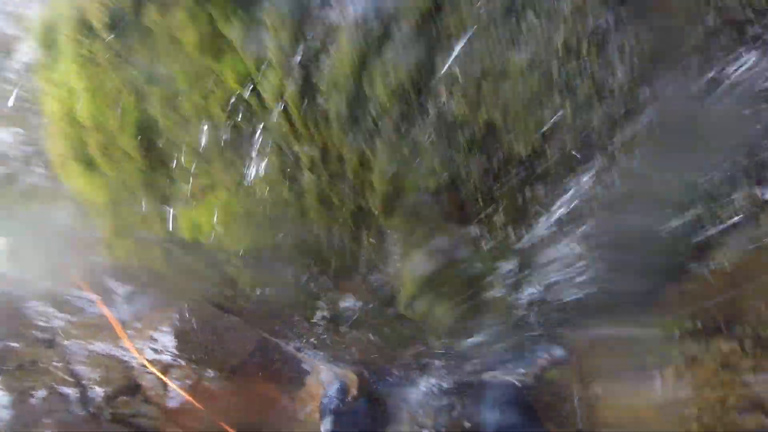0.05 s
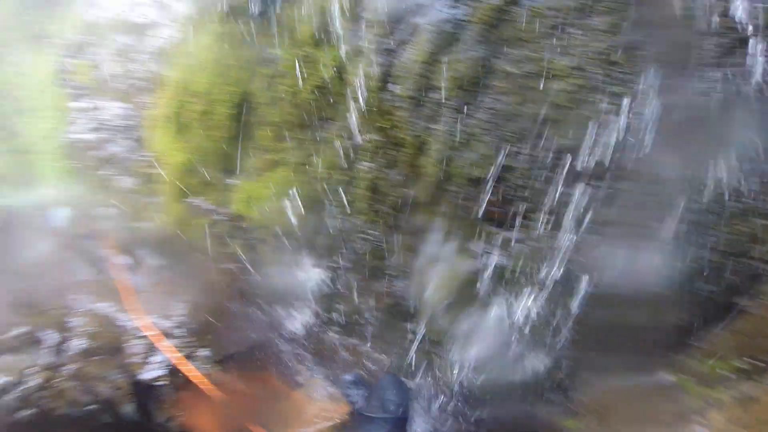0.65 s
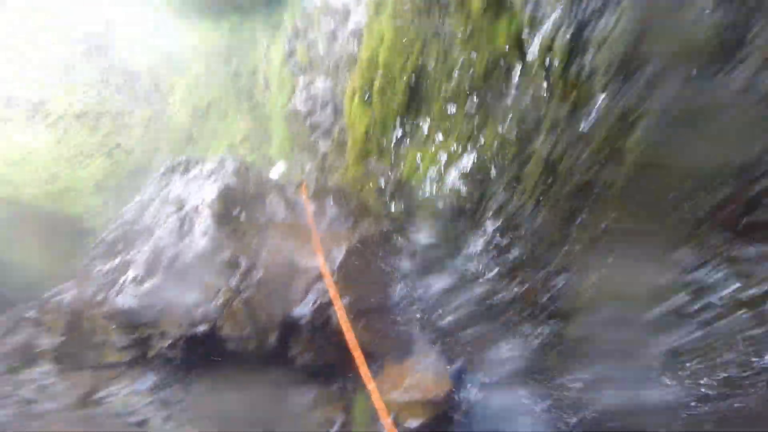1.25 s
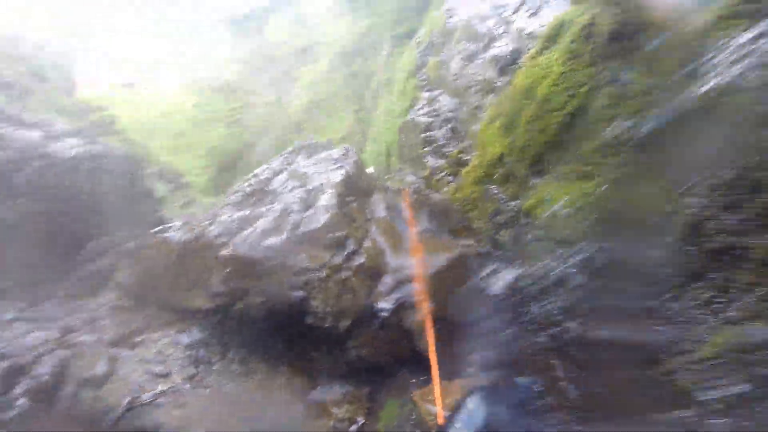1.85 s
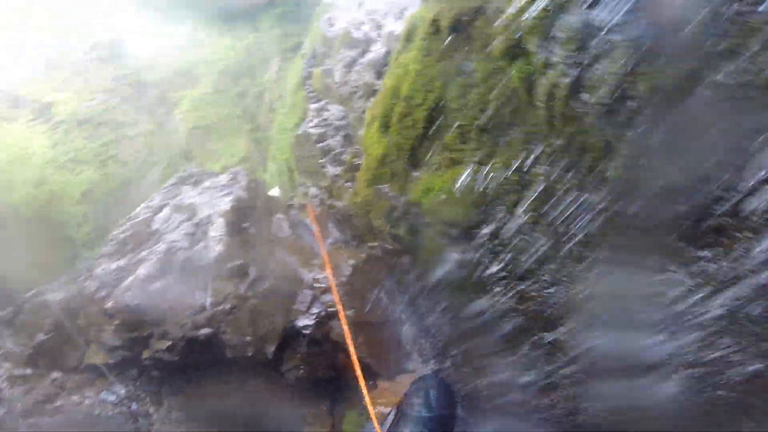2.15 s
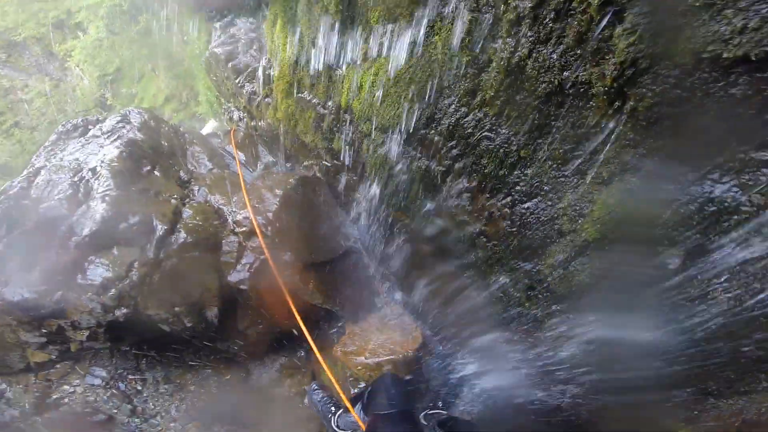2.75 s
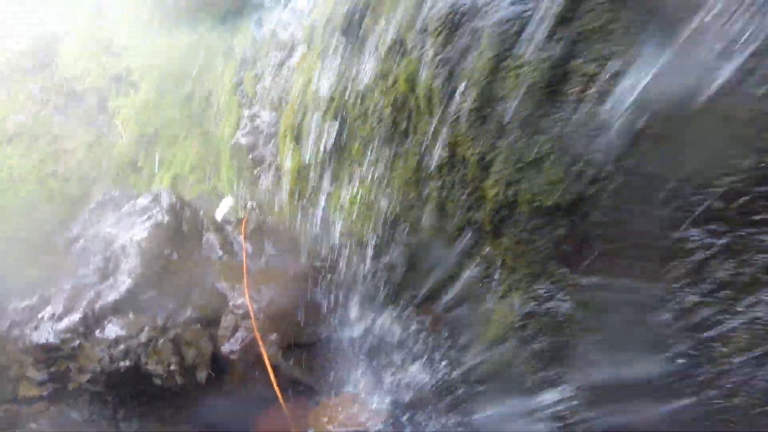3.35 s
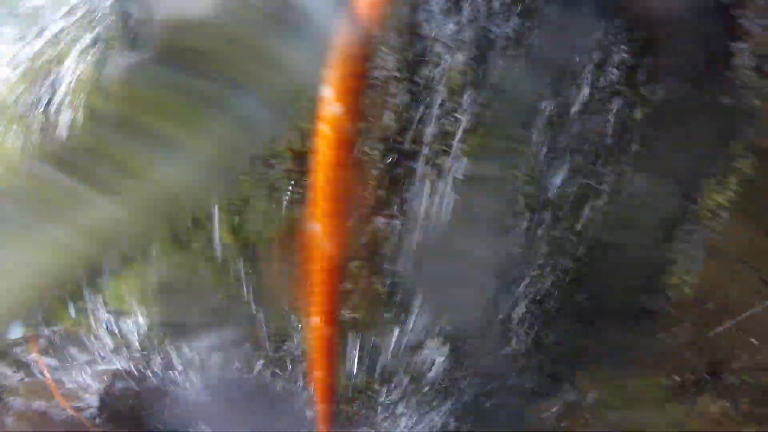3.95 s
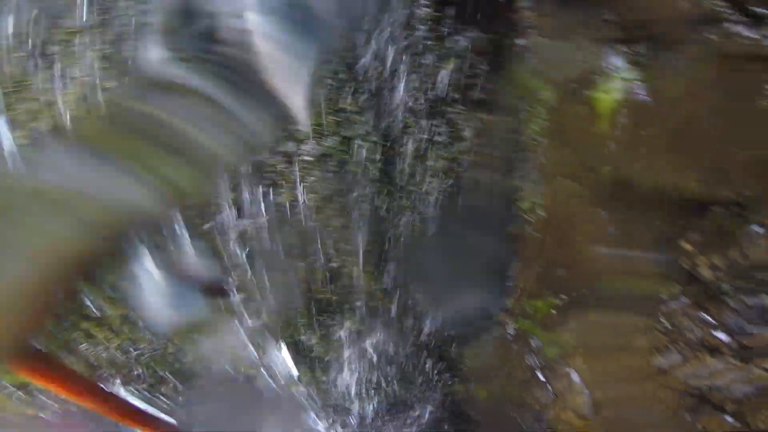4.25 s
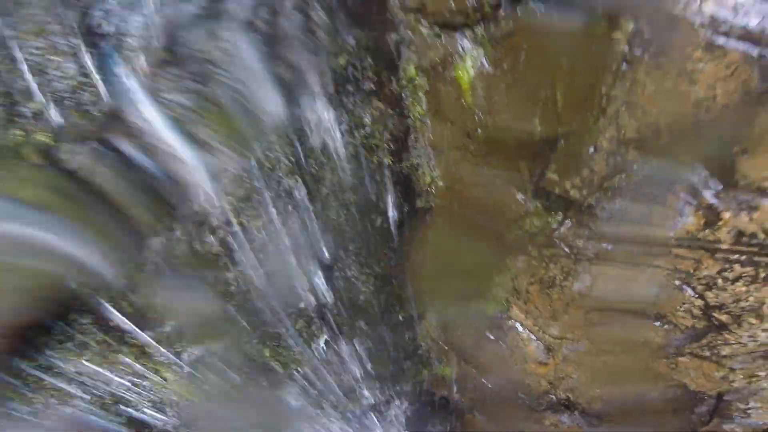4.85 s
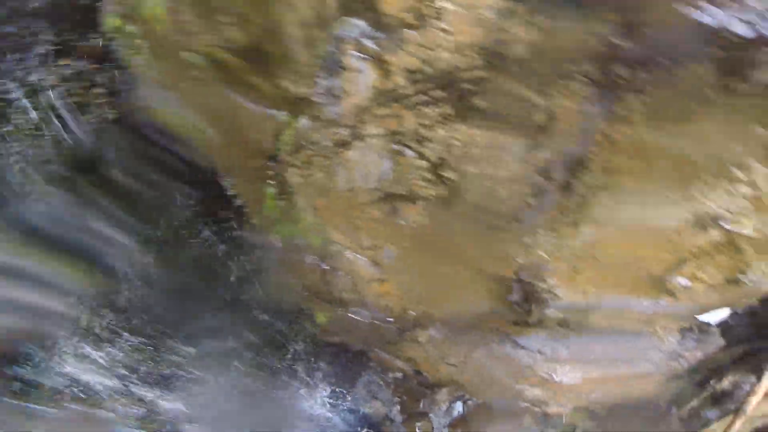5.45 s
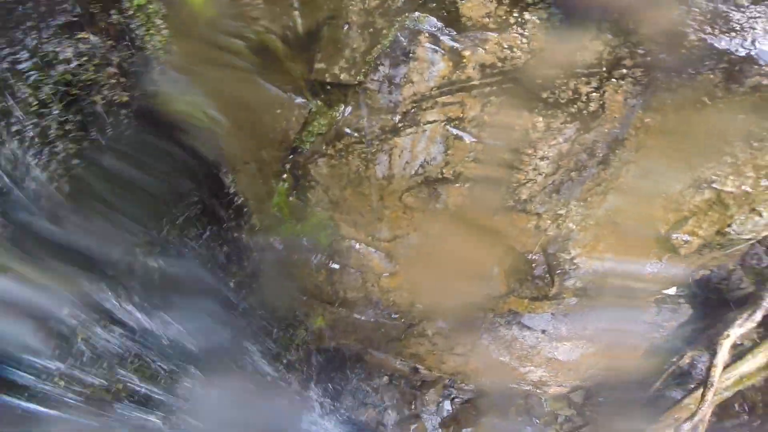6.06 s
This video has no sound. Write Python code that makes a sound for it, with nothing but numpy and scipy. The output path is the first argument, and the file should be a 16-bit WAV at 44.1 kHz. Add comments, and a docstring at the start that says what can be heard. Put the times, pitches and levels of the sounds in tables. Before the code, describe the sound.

Heard from inside a moving camera's waterproof case, a close waterfall sprays over mossy rock with a continuous, slightly ringing hiss. Light taps of water give way to a run of loud, sharp knocks and thumps as drops strike the case in the middle. Brief trickles gurgle over it and something wet rubs it once. The spray carries on with a few last knocks and a soft rumble from the mount.

```python
"""Waterfall spray on a camera case

A small waterfall sprays over mossy rock, right beside a moving camera in a waterproof case.
The water hisses and patters through the resonances of the case; streams gurgle over it, drops knock
and spatter on it, and something wet rubs along it once. Handling rumbles in the mount, and a limiter
pulls the water down after the hardest drops."""
import sys
import numpy as np
from scipy import signal
from scipy.io import wavfile
from scipy.ndimage import uniform_filter1d, minimum_filter1d

SR = 44100
rng = np.random.default_rng(int(sys.argv[2]) if len(sys.argv) > 2 else 0)


def store_pcm(level_fs):
    """Save levels as 16-bit WAV."""
    pcm = np.round(np.clip(level_fs, -1, 1) * 32767).astype(np.int16)
    wavfile.write(sys.argv[1], SR, np.atleast_2d(pcm).T)


N = 273420
TIME = np.arange(N) / SR

# the falling water as the camera moves in and out of it: time_s, gush_db, spray_db
WATER_LEVELS = [(0.0, -43.5, -45), (0.75, -43, -42), (1.2, -44, -43.5), (1.45, -42, -42.5),
                (1.85, -44.5, -45), (2.3, -43.5, -43.5), (2.95, -43.5, -40.5), (3.6, -39.5, -38),
                (4.25, -35.5, -34), (4.65, -39.5, -38), (5.33, -37, -33), (5.55, -42, -40),
                (6.2, -42.5, -40.5)]
# hard drops on the case: start_s, peak_db, pitch_hz, second_pitch_hz, push_db, splash_db, thump_db
# (push and splash are relative to the ring of the case; the mount's thump has its own level)
HARD_DROPS = [(0.4577, -18.5, 1610, 3720, -17, -15, -48), (0.5207, -19.5, 2360, 1430, -28, -16, -38),
              (0.5488, -17.5, 4870, 1900, -34, 2, -45), (0.7783, -18.5, 690, 1400, -5, -9, -26.5),
              (1.2818, -19, 1480, 990, -21, -20, -34), (1.3925, -11, 1740, 1770, 7, -9, -37),
              (1.5025, -11.5, 2180, 5000, -5, 1, -32), (1.5412, -25.5, 1190, 2620, -3, -8, -45),
              (1.559, -16.5, 1640, 2700, -12, -5.5, -43), (2.8701, -5.5, 1540, 2480, 2, -11, -46),
              (2.8936, -12, 2190, 1490, -18, -18, -42), (3.0728, -23.5, 2590, 1470, -32, -6, -26),
              (3.1189, 2, 2330, 2830, -25, -3, -48), (3.153, 13.5, 2490, 2360, -18, -11, -8),
              (3.1612, 16, 1600, 2510, -18, -10.5, -21), (3.2039, 7.5, 590, 2520, 3.5, -2, -6),
              (3.2248, -12, 1670, 1760, -34, -25, -50), (3.271, 5, 2800, 2320, -18, -6.5, -40),
              (3.3292, 7.5, 1450, 2920, -22, -13.5, -9), (3.351, 5.5, 2540, 2030, -20, -4.5, -42),
              (3.4989, -1, 3540, 1940, -11, 1.5, -15.5), (3.6513, -13.5, 2230, 2620, -32, -16, -40),
              (3.7672, -1, 2270, 5950, -25, -5, -32), (3.8016, 9, 2020, 5270, -11, -2, 0.5),
              (3.9575, 16.5, 1616, 2180, -20, -18.5, -9.5), (4.262, -12, 2880, 1070, -13, -8, -20.5),
              (4.467, 13, 2370, 2156, -26.5, -13.5, -41), (4.4783, 10.5, 2150, 2510, -14, -6, -13.5),
              (4.6474, -2.5, 1540, 2050, -1.5, -17, -40), (4.7584, -12, 1490, 2900, -13, -6, -13),
              (4.7858, -10, 1610, 3420, -15, -25, -30), (4.8268, -2, 1550, 2330, -22, -8.5, -41),
              (4.8457, -6, 2140, 1490, -27, -7, -16), (4.8576, 4.5, 1470, 2470, -2.5, -8, -13),
              (4.8879, -4.5, 1760, 2430, -28, -12.5, -48), (4.9128, -2, 1240, 3230, -22, -31, -41),
              (5.3232, -8, 4640, 5800, -32, 10, -29.5), (5.9255, -18, 1420, 2160, -25, -14, -27),
              (6.0918, -5, 2440, 1130, -9.5, -6, -7), (6.124, -16, 3150, 2300, -16, -3, -27),
              (6.1929, -11.5, 2380, 4540, -47, -9, -50)]
# what the stiff wall passes to the air inside: frequency_hz, gain_db
WALL_RESPONSE = [(100, -45), (400, -13), (700, -2.5), (1000, 1.5), (1450, -5), (2650, -3.5), (3100, -3),
                 (4000, -1), (8000, -33.5), (16000, -36)]
# the bright splash of a bursting drop: frequency_hz, gain_db
SPLASH_SPECTRUM = [(500, -26), (2500, 2), (3800, 1), (4800, 1.5), (6200, 0.5), (7800, -8), (10000, -12.5),
                   (12500, -19), (16000, -25.5)]


def gain_of(db):
    """Decibels to amplitude."""
    return 10 ** (np.asarray(db) / 20)


def unit_rms(x):
    """Scales to rms 1."""
    return x / np.sqrt(np.mean(x ** 2) + 1e-20)


def automation(rows):
    """One curve across the scene for each value column of a timed table."""
    times, *columns = np.transpose(rows)
    return [np.interp(TIME, times, column) for column in columns]


def add(mix, start_s, sound):
    """Mixes a sound in at start_s."""
    part = mix[max(round(start_s * SR), 0):][:len(sound)]
    part += sound[:len(part)]


def colour(x, spectrum, size=4096):
    """Minimum-phase EQ with the given spectrum: clicks ring after they land."""
    hz, db = np.transpose(spectrum)
    bin_hz = abs(np.fft.fftfreq(size, 1 / SR))
    log_gain = np.log(gain_of(np.interp(np.log(bin_hz + 1), np.log(hz), db)))
    response = np.fft.ifft(np.exp(np.conj(signal.hilbert(log_gain)))).real
    return signal.oaconvolve(x, response[:size // 2])[:len(x)]


def wander(slow_hz, fast_hz, count=30):
    """Smooth random drift of rms 1."""
    t = TIME[::64]
    waves = sum(np.sin(2 * np.pi * (hz * t + rng.random())) for hz in np.geomspace(slow_hz, fast_hz, count))
    return np.interp(TIME, t, unit_rms(waves))


def ring(t, hz, t60, rise_s=0.00025):
    """One struck mode, building up over the short time that the blow lasts."""
    return (1 - np.exp(-t / rise_s)) * gain_of(-60 * t / max(t60, .001)) * np.sin(2 * np.pi * hz * t)


def patter(per_s, spread_db):
    """Random impacts, many small and a few large."""
    size = gain_of(spread_db * np.minimum(rng.exponential(1, N), 5))
    return unit_rms(size * rng.choice([-1, 1], N) * (rng.random(N) < per_s / SR))


def churn(x, patchy_db, tilt_db):
    """Splashes come and go in patches of time and pitch; the treble tilts by tilt_db per octave."""
    hz, t, bins = signal.stft(x, SR, nperseg=512, noverlap=384)
    patches = uniform_filter1d(rng.standard_normal(bins.shape), size=6, axis=0)
    patches = unit_rms(uniform_filter1d(patches, size=12, axis=1))
    treble_db = np.log2(np.maximum(hz, 5000) / 5000)[:, None] * np.interp(t, TIME, tilt_db)
    _, churned = signal.istft(bins * gain_of(patchy_db * patches + treble_db), SR, nperseg=512, noverlap=384)
    return unit_rms(churned[:N])


def pings(low_hz, high_hz, per_s, spread_db, cycles, count=32):
    """Separate droplets and bursting bubbles: short pings of many pitches."""
    t = np.arange(800) / SR
    clicks, which = patter(per_s, spread_db), rng.integers(0, count, N)
    tones = [unit_rms(ring(t, hz, cycles / hz)) for hz in np.geomspace(low_hz, high_hz, count)]
    return unit_rms(sum(signal.oaconvolve(clicks * (which == k), tone)[:N] for k, tone in enumerate(tones)))


def waterfall(gush_surge_db=1.47, spray_surge_db=1.76):
    """A blur of far impacts with nearer ones standing out: gush on the rock, fine spray above it."""
    # the body of the gush: frequency_hz, gain_db
    gush_spectrum = [(100, -5.5), (250, -12.5), (450, -14.5), (800, -15.5), (1200, -11.5), (1500, -5.5),
                     (2000, -5), (2450, 1), (2800, -5.5), (3200, -15), (4500, -35)]
    # the hiss of the spray: frequency_hz, gain_db
    spray_spectrum = [(1500, -32.5), (2900, -7), (3300, -10), (3700, 1), (4150, -3), (4700, 4),
                      (5200, -2.5), (5800, 0.5), (6700, -6.5), (8000, -13.5), (9200, -13), (10200, -10.5),
                      (11200, -18.5), (12500, -16.5), (15300, -37)]
    # the case turns towards the fine spray: time_s, treble_db_per_octave
    facing = [(0, -2), (1.4, 1.8), (6.2, 2)]
    gush_db, spray_db = automation(WATER_LEVELS)
    tilt_db, = automation(facing)
    surge = wander(4, 60)  # the fall is uneven: both layers swell and sink together
    gush = colour(rng.standard_normal(N) + gain_of(-4) * patter(per_s=900, spread_db=5.5), gush_spectrum)
    spray = rng.standard_normal(N) + gain_of(-6.5) * patter(per_s=4200, spread_db=5.5)
    spray = colour(spray, spray_spectrum)
    gush = churn(gush, patchy_db=1.1, tilt_db=tilt_db)
    gush += gain_of(-9) * pings(1643, 3190, per_s=220, spread_db=2, cycles=38)
    spray = churn(spray, patchy_db=1.62, tilt_db=tilt_db)
    spray += gain_of(-8.5) * pings(3440, 6880, per_s=400, spread_db=5, cycles=42)
    gush *= gain_of(gush_db + gush_surge_db * surge)
    spray *= gain_of(spray_db + spray_surge_db * surge)
    return gush + spray


def handling():
    """The mount rumbles unevenly as the camera is carried; short low pulses stand out of the rumble."""
    # the ride of the handling rumble: time_s, level_db
    rumble_levels = [(0.0, -34.5), (0.75, -33.5), (1.7, -38.5), (2.0, -43), (3.0, -37.5), (3.3, -23),
                     (3.55, -40), (4.3, -33), (5.0, -34.5), (5.55, -43), (6.2, -31.5)]
    # the low end of the mount: frequency_hz, gain_db
    mount_spectrum = [(12, -5), (25, 4.5), (35, 2), (47, 1.5), (60, -0.5), (78, -19.5), (100, -7),
                      (125, -7), (160, -15.5), (220, -27), (400, -39.5), (800, -52.5)]
    # low bumps of the mount, then the low body of the wet rub and a brief soft hum (the last two rows):
    # centre_s, peak_db, pitch_hz, half_length_s
    low_pulses = [(0.275, -24.5, 130, 0.024), (0.593, -18.5, 110, 0.008), (0.789, -28.5, 57.4, 0.048),
                  (0.934, -18, 46, 0.01), (1.55, -22.5, 125, 0.0075), (1.666, -16.5, 42.6, 0.019),
                  (1.68, -31, 128, 0.026), (2.215, -19.5, 76.4, 0.004), (2.277, -23, 42.5, 0.041),
                  (2.342, -28.5, 128, 0.0097), (4.478, -12.5, 52.5, 0.0074), (4.785, -21.5, 121, 0.027),
                  (5.455, -39, 156, 0.12)]
    level_db, = automation(rumble_levels)
    out = unit_rms(colour(rng.standard_normal(N), mount_spectrum, size=16384))
    out *= gain_of(level_db + 2.9 * wander(1.83, 4.6))
    for centre_s, peak_db, hz, half_s in low_pulses:
        t = np.arange(-3 * half_s, 3 * half_s, 1 / SR)
        pulse = np.exp(-(t / half_s) ** 2) * np.cos(2 * np.pi * hz * t)
        add(out, centre_s + t[0], -gain_of(peak_db) * pulse)
    return out


def trickles(spread=0.056):
    """A dense run of small bubbles of nearly one size gurgles at one pitch, swelling and fading."""
    # streams running over the case: start_s, length_s, level_db, pitch_hz
    streams = [(0.03, 0.35, -44.5, 2200), (2.70, 0.15, -40, 2240), (5.269, 0.24, -40, 2390)]
    out = np.zeros(N)
    for start_s, length_s, level_db, hz in streams:
        swell = signal.windows.tukey(round(length_s * SR), .6)
        bubbles = pings(hz * (1 - spread), hz * (1 + spread), per_s=1200, spread_db=5.5, cycles=35, count=5)
        add(out, start_s, gain_of(level_db) * swell * unit_rms(bubbles[:len(swell)]))
    return out


def tick(spot, length):
    """A small drop ticks on the case with a pinch of splash; spot and length (0-1) set pitch and decay."""
    t = np.arange(1500) / SR
    ping = ring(t, 1400 + 1400 * spot, 0.005 + 0.013 * length) + 0.36 * ring(t, 3300, 0.0069)
    fizz = 0.34 * rng.standard_normal(len(t)) * np.exp(-t / 0.00049)
    return colour(ping, WALL_RESPONSE) + colour(fizz, SPLASH_SPECTRUM)


def stray_droplets(count=70, trim_db=-47, range_db=4):
    """Stray drops land at random, harder in thick spray."""
    out = np.zeros(N)
    for when, spot, size, length in rng.random((count, 4)):
        add(out, when * N / SR, gain_of(trim_db + range_db * size ** 2) * tick(spot, length))
    _, spray_db = automation(WATER_LEVELS)
    return out * gain_of(0.88 * (spray_db - spray_db.mean()))


def hard_drops(second_mode_db=-4.5, damping=0.19, mount_hz=116, mount_t60_s=0.1):
    """Each drop shoves the wall of the case, rings it, bursts into a splash and sets the mount swinging."""
    # the dull shove of a drop on the wall: frequency_hz, gain_db
    push_spectrum = [(15, -40), (60, 6.5), (150, 3), (300, 1), (480, -3.5), (700, -4), (950, -5.5),
                     (1400, -7), (3000, -17), (8000, -53)]
    # modes of the case: pitch_hz, level_db, t60_s
    case_modes = [(750, -9, 0.0044), (1420, -21, 0.032), (1683, 2, 0.007), (1988, -24, 0.059),
                  (2105, -5.5, 0.011), (2614, 5, 0.0063), (3030, -6.5, 0.0038)]
    out, t = np.zeros(N), np.arange(4000) / SR
    blow = 1. * (t == 0)
    push = unit_rms(colour(blow, push_spectrum))
    wall = sum((-1) ** k * gain_of(db) * ring(t, hz, t60) for k, (hz, db, t60) in enumerate(case_modes))
    burst = (1 - np.exp(-t / 0.00008)) * (np.exp(-t / 0.0011) + gain_of(-14) * np.exp(-t / 0.0022))
    for start_s, peak_db, hz, second_hz, push_db, splash_db, thump_db in HARD_DROPS:
        t60 = 0.0082 * gain_of(-damping * push_db)  # a heavy push shortens the ring of the struck spot
        spot = ring(t, hz, t60) - gain_of(second_mode_db) * ring(t, second_hz, t60)
        # a first blow, then spatter, more of it for a wetter drop
        force = blow + 0.16 * gain_of(0.35 * splash_db) * rng.standard_normal(len(t)) * np.exp(-t / 0.0025)
        ringing = signal.fftconvolve(force, spot + gain_of(-7) * wall)[:len(t)]
        body = unit_rms(colour(ringing, WALL_RESPONSE))
        splash = unit_rms(colour(rng.standard_normal(len(t)) * burst, SPLASH_SPECTRUM))
        knock = body + gain_of(push_db) * push + gain_of(splash_db) * splash
        thump = gain_of(thump_db) * ring(t, mount_hz, mount_t60_s)
        add(out, start_s, thump - gain_of(peak_db) * knock / abs(knock).max())
    return out


def spatter(count=3, trim_db=-29, scatter_s=0.066):
    """Each hard drop breaks into a few small ones, which land just after it, the late ones weakest."""
    out = np.zeros(N)
    for start_s, peak_db, *_ in HARD_DROPS:
        for late, spot, length in rng.random((count, 3)):
            landing_s = start_s + 0.004 + scatter_s * late ** 2
            add(out, landing_s, gain_of(peak_db + trim_db - 12 * late) * tick(spot, length))
    return out


def wet_rub(start_s=4.752, length_s=0.06, level_db=-30.5):
    """Something wet rubs along the case with a short, low gurgle."""
    # the tone of the rub: frequency_hz, gain_db
    rub_spectrum = [(60, -13), (150, 5), (260, 1), (420, -0.5), (650, -29), (1600, -7), (4000, -45)]
    rub = unit_rms(colour(rng.standard_normal(round(length_s * SR)), rub_spectrum))
    out = np.zeros(N)
    add(out, start_s, gain_of(level_db) * rub * signal.windows.tukey(len(rub), .4))
    return out


def scene():
    """Everything as it reaches the one microphone inside the case."""
    water = waterfall() + trickles() + stray_droplets() + hard_drops() + spatter()
    return (water + wet_rub() + handling())[None]


def record(dry, ceiling_db=-0.76, recovery_db_per_s=12, cutoff_hz=15750):
    """A peak limiter clamps at once and recovers slowly; a steep low-pass trims the top."""
    over_db = np.maximum(20 * np.log10(abs(dry[0]) + 1e-9) - ceiling_db, 0)
    recovery_db = recovery_db_per_s * TIME
    duck_db = np.maximum.accumulate(over_db + recovery_db) - recovery_db
    duck_db = uniform_filter1d(-minimum_filter1d(-duck_db, size=25), size=25)  # rounds off the attack
    lowpass = signal.firwin(255, cutoff_hz, window=("kaiser", 8), fs=SR)
    return signal.oaconvolve(dry * gain_of(-duck_db), lowpass[None], "same")


dry = scene()
out = record(dry)
store_pcm(out)
```